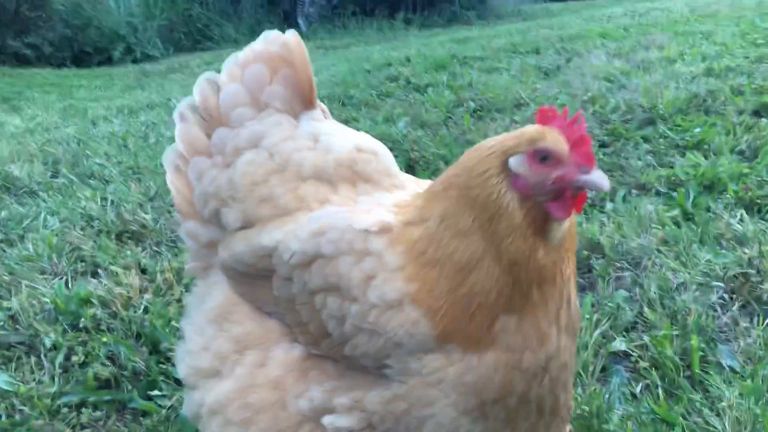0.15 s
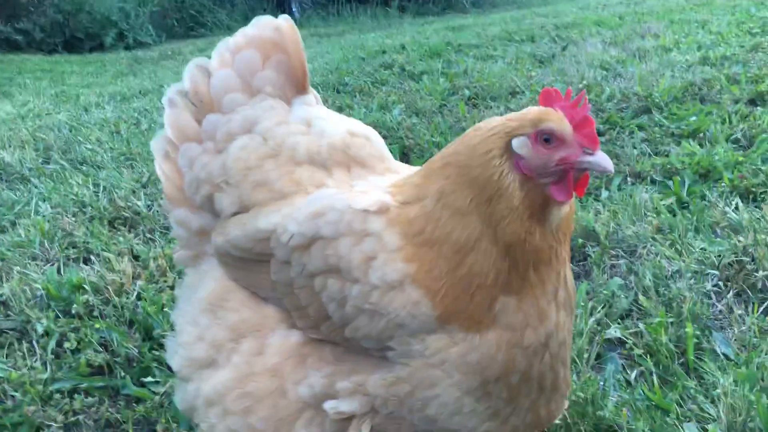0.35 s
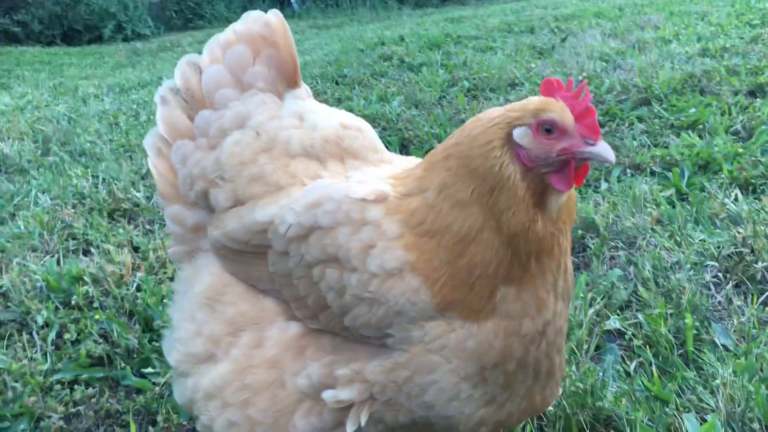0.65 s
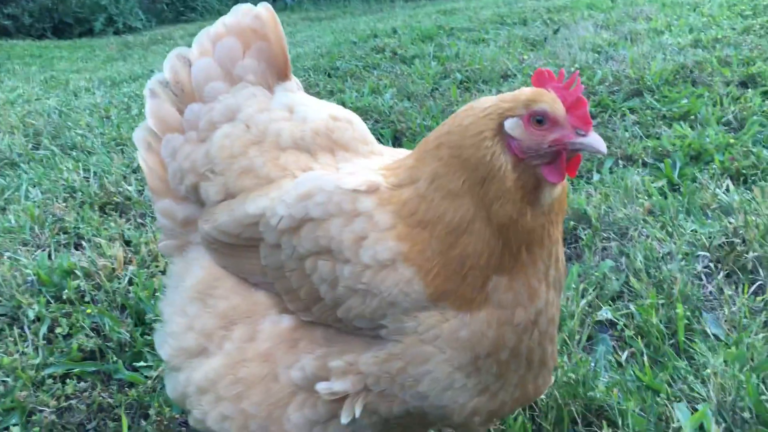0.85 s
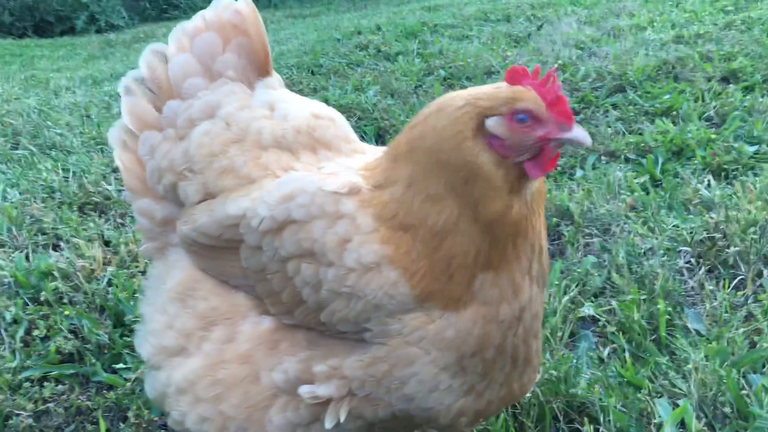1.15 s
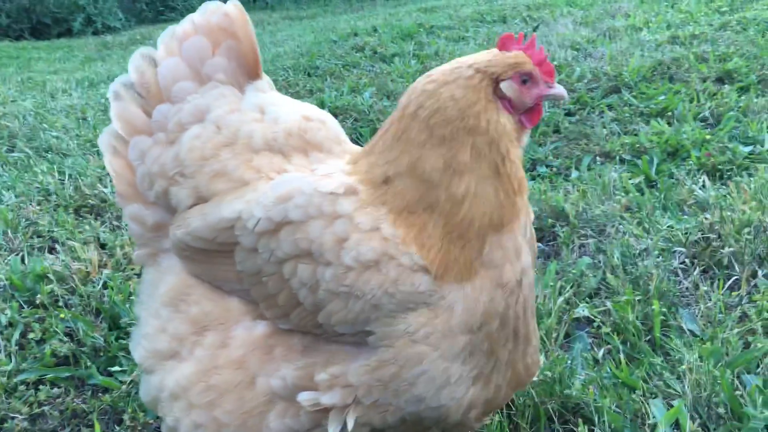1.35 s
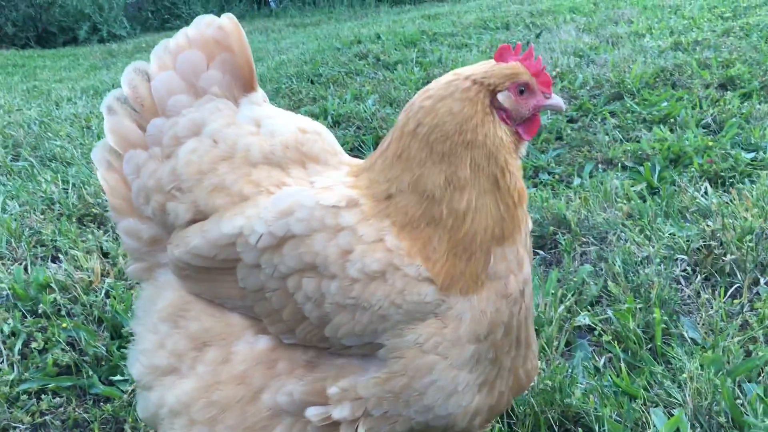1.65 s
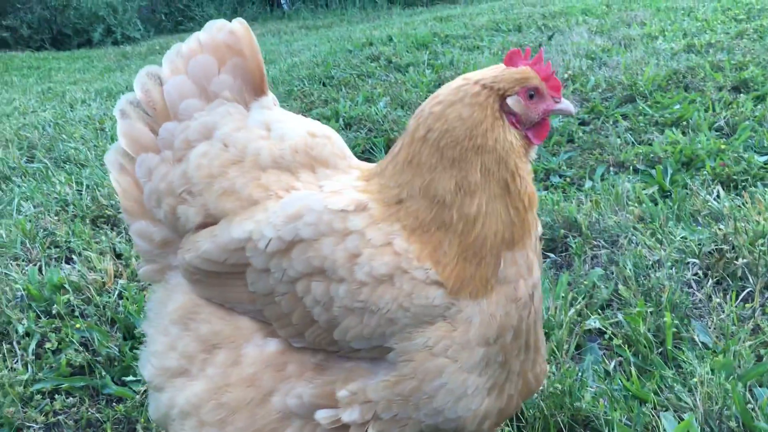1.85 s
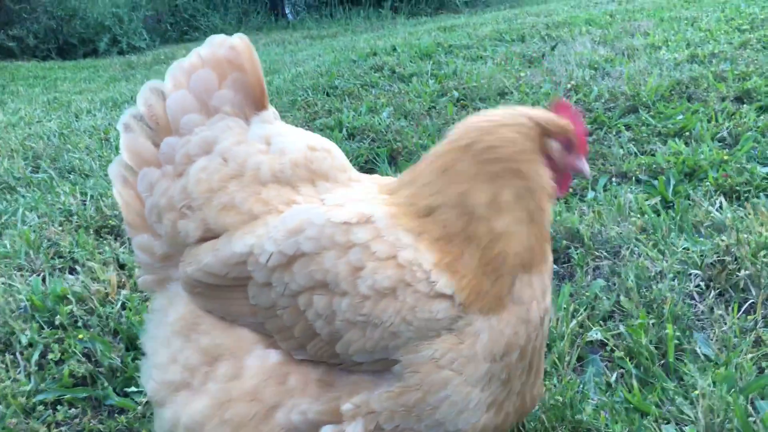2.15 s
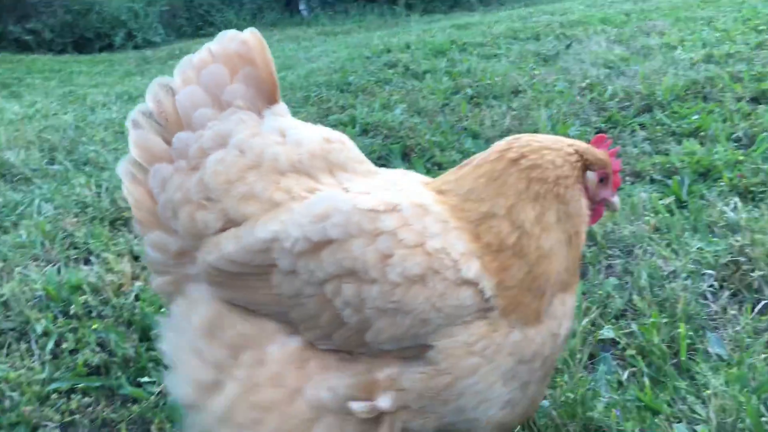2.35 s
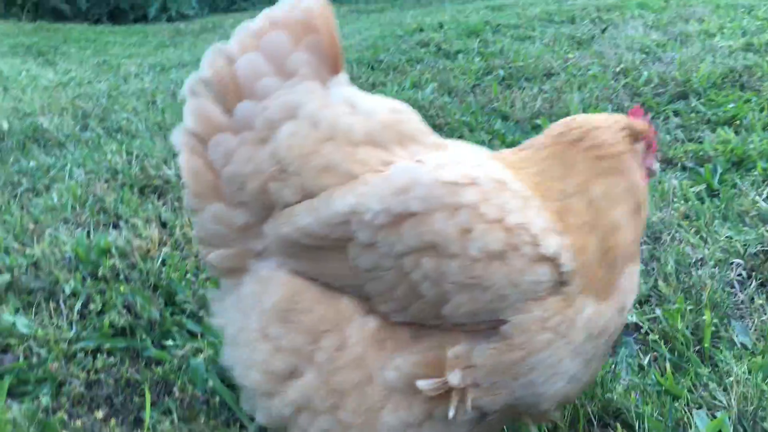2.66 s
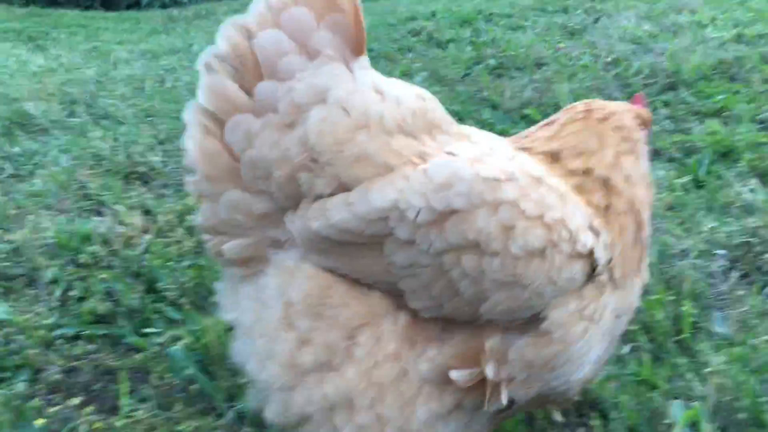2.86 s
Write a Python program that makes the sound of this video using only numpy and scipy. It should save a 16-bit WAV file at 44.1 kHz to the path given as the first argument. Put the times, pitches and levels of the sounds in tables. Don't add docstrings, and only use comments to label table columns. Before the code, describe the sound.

Hen clucking softly outdoors: a single cluck, a purring rattle, then sparse clucks over faint birds

```python
import sys
import numpy as np
from scipy import signal
from scipy.fft import rfft, irfft
from scipy.io import wavfile

SR = 44100
rng = np.random.default_rng(int(sys.argv[2]) if len(sys.argv) > 2 else 0)


def invert_db(level):
    return 10 ** (np.asarray(level, dtype=float) / 20)


def waveform_to_disk(signal):
    frames = np.transpose(np.atleast_2d(signal))
    scaled = np.clip(frames, -1, 1) * 32767
    samples = np.round(scaled).astype(np.int16)
    wavfile.write(sys.argv[1], SR, samples)


N = 132300


def rms_one(x):
    return x / np.sqrt(np.mean(x ** 2) + 1e-24)


def resonate(x, hz, width):
    r = np.exp(-np.pi * max(width, 5) / SR)
    feedback = [1, -2 * r * np.cos(2 * np.pi * hz / SR), r * r]
    return signal.lfilter([(1 - r * r) / 2, 0, (r * r - 1) / 2], feedback, x + 1e-18)


def band_pass(x, low_hz, high_hz):
    return signal.sosfilt(signal.butter(2, (low_hz, high_hz), "band", fs=SR, output="sos"), x)


def hump(x, rise=0.5):
    x = np.clip(x, 0, 1)
    return np.sin(np.pi / 2 * np.where(x < rise, x / rise, (1 - x) / (1 - rise))) ** 2


def add(out, start_s, x):
    i = max(int(start_s * SR), 0)
    out[i:i + len(x)] += x[:N - i]


def drift(rate):
    return np.interp(np.arange(N) * rate / SR, np.arange(200), rng.standard_normal(200))


def coloured(spectrum, patchy_db):
    hz, db = np.transpose(spectrum)
    f = np.arange(N // 2 + 1) * SR / N + 0.00092
    shaped = rfft(rng.standard_normal(N)) * invert_db(np.interp(np.log(f), np.log(hz), db, left=-90))
    third = 3 * np.log2(f)
    out = np.zeros(N)
    for k in range(int(3 * np.log2(hz[0])) - 1, int(3 * np.log2(hz[-1])) + 2):
        band = irfft(shaped * np.maximum(1 - abs(third - k), 0), N)
        out += band * invert_db(patchy_db * drift(8.66))
    return rms_one(out)


# (pitch_hz, level_db per Hz)
RUMBLE = [(19, -43.5), (33, -20), (49, -1), (70, -2), (114, -6.5), (238, -12.5), (281, -17.5), (305, -18.5),
          (550, -32.5), (720, -61), (1210, -120)]
# (pitch_hz, level_db per Hz)
ROAD = [(320, -9), (550, -8.5), (817, -5.5), (983, -0.5), (1100, -2), (1380, -2), (1500, -5), (3170, -22.5),
        (4500, -25.5), (5850, -85), (9900, -120)]
# (pitch_hz, level_db per Hz)
HISS = [(2650, -40.5), (4500, -7), (4990, -1.5), (5620, -1), (7470, -6.5), (9520, -4.5), (10300, -11),
        (11600, -6), (15500, -10)]
# (time_s, level_db)
LEAVES = [(.9, -90), (1.2, -81), (1.5, -80.5), (1.9, -84)]
RUMBLE_DB, ROAD_DB, HISS_DB = -51, -60, -78.5
HUM_HZ, HUM_WIDTH_HZ, HUM_DB = 91.9, 9.5, -57.5


def floor():
    hum = resonate(rng.standard_normal(N), HUM_HZ, HUM_WIDTH_HZ)
    hum = rms_one(resonate(hum, HUM_HZ, HUM_WIDTH_HZ))
    leaves = rms_one(band_pass(rng.standard_normal(N), 3620, 6200))
    breeze = invert_db(np.interp(np.arange(N) / SR, *np.transpose(LEAVES)))
    out = invert_db(RUMBLE_DB) * coloured(RUMBLE, patchy_db=-1.5)
    out += invert_db(HUM_DB) * hum
    out += invert_db(ROAD_DB) * coloured(ROAD, patchy_db=0.6)
    out += invert_db(HISS_DB) * coloured(HISS, patchy_db=-1.6)
    return out + breeze * leaves


# (centre_s, length_s, level_db, low_edge_hz, high_edge_hz)
RUSTLES = [(.005, 0.0089, -66.5, 3000, 16000), (0.24, 0.015, -72, 3000, 5200),
           (2.158, 0.004, -66, 3000, 10100), (2.175, 0.11, -77, 9900, 16000),
           (2.65, .9, -81.5, 7000, 16200), (2.202, .004, -69, 8000, 16000), (2.236, .004, -70, 3000, 14000),
           (2.482, .006, -71, 14000, 16000), (2.588, 0.11, -78, 10000, 15900),
           (2.611, .06, -71, 3880, 8700), (2.676, 0.012, -70.5, 4000, 16000),
           (2.696, .03, -81, 11000, 16000), (2.784, .006, -71, 4500, 9000), (2.887, .004, -68, 6960, 16000),
           (2.922, 0.057, -70, 8000, 15900), (2.939, 0.18, -71, 2900, 8700),
           (2.925, 0.015, -61, 2780, 6770), (2.944, .012, -64, 3000, 7000),
           (2.963, 0.015, -76, 5000, 16000), (2.972, 0.007, -68.5, 11000, 16000),
           (2.996, 0.0046, -71, 8000, 16000), (2.172, .06, -53, 64.4, 162), (2.215, 0.0222, -55, 80, 200)]
GRAINS_PER_S, GRAIN_SPREAD_DB = 10000, 2.2


def grass():
    out = np.zeros(N)
    for centre, length, db, low, high in RUSTLES:
        draw = rng.random((3, 40000))
        clicks = (draw[0] < GRAINS_PER_S / SR) * np.sign(draw[1] - 0.5)
        clicks = clicks * invert_db(-GRAIN_SPREAD_DB * np.log(draw[2] + 0.00081))
        rustle = rms_one(band_pass(clicks, low, high))
        add(out, centre - length / 2, invert_db(db) * rustle * hump(np.arange(40000) / SR / length))
    return out


# (start_s, length_s, start_pitch_hz, end_pitch_hz, level_db)
CHIPS = [
    (.489, 0.03, 5400, 5060, -67),
    (1.629, 0.019, 5520, 5034, -62),
]
# (start_s, length_s, start_pitch_hz, end_pitch_hz, level_db)
WHISTLES = [
    (1.62, 0.073, 3020, 2570, -70.5),
    (2.03, 0.12, 2794, 2260, -68.5),
    (2.135, 0.024, 2720, 2555, -66),
    (2.572, 0.03, 2790, 2520, -66.5),
    (2.788, 0.095, 4900, 4850, -74.5),
    (1.1, 0.056, 4250, 4150, -81),
    (1.3, 0.15, 4050, 3750, -82),
]
TREES_T60_S = 0.93
FLUTTER_S = 0.008


def birds(notes, echo_db, bend, flutter_db):
    out, t = np.zeros(N), np.arange(6000) / SR
    for start, length, first_hz, last_hz, db in notes:
        hz = last_hz + (first_hz - last_hz) * np.clip(1 - t / length, 0, 1) ** bend
        waver = invert_db(flutter_db * np.interp(t / FLUTTER_S, np.arange(20), rng.standard_normal(20)))
        waver = waver / np.sqrt(np.mean(waver[t < length] ** 2))
        shape = waver * hump(t / length, rise=0.28) ** 0.15
        add(out, start, invert_db(db + 1.5) * shape * np.sin(2 * np.pi * np.cumsum(hz) / SR))
    lag = np.arange(SR // 2) / SR
    trees = rng.standard_normal(len(lag)) * invert_db(-60 * lag / TREES_T60_S) * (lag > 0.012)
    echo = signal.fftconvolve(out, trees / np.sqrt(np.sum(trees ** 2)))[:N]
    return out + invert_db(echo_db) * echo


# (start_s, length_s, level_db, first_pulse_rate_hz, last_pulse_rate_hz)
CLUCKS = [
    (.2486, 0.0169, -27.5, 293.6, 340),
    (2.1222, 0.0077, -30.5, 273, 296),
    (2.1253, 0.0044, -48, 303, 301),
    (2.4118, 0.0175, -30, 247.3, 340),
    (2.7288, 0.009, -51.5, 200.4, 200.7),
    (2.735, .014, -51, 416, 435),
    (.8025, 0.0063, -39, 480, 500),
]
# (pitch_hz, width_hz, level_db)
TRACTS = [
    [(340, 335, 5.5), (670, 150, 8.5), (1357, 72, -13.5), (3280, 190, -14.5), (4160, 410, -19.5),
     (8000, 2400, -24)],
    [(328, 330, -4), (700, 210, 0.5), (1560, 150, -17), (2430, 300, -28), (4500, 670, -40),
     (7400, 1500, -44)],
    [(2530, 350, -11), (4030, 430, 5), (5250, 93, -3.5), (6600, 440, -9), (8450, 900, -11)],
    [(290, 132, 3.5), (700, 210, 12.5), (1060, 220, -3), (1730, 110, -7), (2700, 450, -24),
     (3750, 96, -10.5), (4620, 130, -20), (6500, 480, -17), (8340, 150, -30)],
    [(1900, 280, -7), (2400, 160, -9), (3240, 170, -5), (4300, 89, -16)],
    [(1250, 300, 9), (3150, 280, 1), (4370, 97, -12)],
    [(500, 190, 0), (900, 270, 3), (1460, 400, -8), (3180, 160, -4), (4200, 370, -17.5)],
]
# (start_s, length_s, level_db, first_pulse_rate_hz, last_pulse_rate_hz)
SLIPS = [
    (.831, 0.0082, -37, 470, 480),
    (.851, 0.0094, -35.5, 434, 480),
    (.873, 0.0065, -34, 443, 480),
]
# (pitch_hz, width_hz, level_db)
SLIP_TRACT = [(480, 390, 7), (970, 420, 1), (1460, 450, -25), (3130, 340, -14.5), (4250, 280, -24)]
CLUCK_JITTER, CLUCK_RASP = 0.02, 0.2


def clucks(calls, tracts):
    out, t = np.zeros(N), np.arange(3000) / SR
    for (start, length, db, first_hz, last_hz), tract in zip(calls, tracts):
        draw = rng.standard_normal((2, len(t)))
        rate = first_hz + (last_hz - first_hz) * np.clip(t / length, 0, 1)
        rate = rate * (1 + CLUCK_JITTER * np.repeat(draw[0, :30], 100))
        phase = np.cumsum(rate) / SR + 0.65
        pulses = np.diff(np.floor(phase), prepend=0) * hump(t / length, rise=0.47) ** 0.13
        puffs = CLUCK_RASP * draw[1] * np.exp(-4 * (phase % 1))
        puffs = puffs * hump(t / length, rise=0.12) ** 0.12
        voice = np.zeros(len(t))
        for k, (hz, width, gain_db) in enumerate(tract):
            source = pulses + puffs * min(hz / 3000, 1)
            ring = resonate(resonate(source, hz, width * 1.94), hz, width * 1.82)
            voice += (-1) ** k * invert_db(gain_db) * 300 / width * ring
        add(out, start, -invert_db(db) * voice / abs(voice).max())
    return out


# (centre_s, level_db, throat_pitch_hz, rasp_db, length_s)
THROBS = [(0.5492, -31, 715, -13.5, 0.0034), (0.5827, -50, 730, 6, 0.005),
          (0.6388, -38.5, 833, 3.5, 0.0058), (0.658, -29, 820, -6.5, 0.01),
          (0.677, -31.5, 850, -4.5, 0.0087), (0.6955, -28, 823, -8, .011), (0.7149, -27.5, 856, -9.5, .012),
          (0.734, -22, 796, -13, 0.013), (0.753, -23.5, 784, -15, .015), (0.7728, -24.5, 768, -16, 0.014),
          (0.792, -24.5, 698, -15.5, .016), (0.812, -24, 774, -18.5, .014), (0.8285, -30.5, 700, -18, .011),
          (0.8447, -33.5, 706, -12, .012), (0.866, -33, 678, -23, .011), (0.8845, -33.5, 720, -24, .012),
          (1.11, -46, 684, -25, 0.007), (2.132, -33, 688, -35, .012), (2.142, -36, 680, -21, .014),
          (2.432, -34.5, 687, -38, 0.017), (0.2633, -28.5, 670, -42, .012),
          (2.7315, -37, 737, -30, 0.00827), (2.7358, -35, 880, -22, .007), (2.747, -48, 1240, -30, .012)]
# (pitch_hz, width_hz, level_db)
PIPE = [
    (1300, 192, 11),
    (2130, 120, -12.5),
    (2830, 175, 3.5),
    (4140, 200, -14.5),
    (5200, 280, -19.5),
    (6300, 930, -25),
    (8060, 260, -23),
    (480, 290, 2),
]
# (time_s, share of pitch)
SAG = [(.56, -0.3), (.64, 0.32), (.72, .25), (.735, -0.14), (.815, -.04), (.83, .3), (.89, 0.029),
       (2.2, 0.12), (2.7, 0.1)]
BEAK_S, BEAK_SHIFT = (0.49, 0.633, 0.78), (1.16, 0.99, 1.11)
SWELL_S, THROB_RISE = (0.94, 0.735), (0.31, 0.5)
RASP_LAG_S, RASP_SHARE = (0.00164, 0.0035), 0.844
RASP_PER_S = 900
RING_DOWN_S = 0.001975


def trill():
    out, t = np.zeros(N), np.arange(1800) / SR
    for centre, db, throat_hz, rasp_db, length in THROBS:
        draw = rng.random((3, len(t)))
        rise = np.interp(centre, SWELL_S, THROB_RISE)
        sag = np.interp(centre, *np.transpose(SAG))
        hz = throat_hz * (1 + sag * (0.5 - t / length))
        swing = hump(t / length, rise) ** 4 * np.sin(2 * np.pi * np.cumsum(hz) / SR)
        swing = resonate(swing, throat_hz, 1 / (np.pi * RING_DOWN_S))

        slaps = ((draw[0] < RASP_PER_S / SR) + 0.13) * (draw[1] - 0.5)
        slaps = slaps * hump(t / length / RASP_SHARE, rise=0.42) ** 0.2
        slaps[30] = 0.32
        slaps = np.roll(slaps, int(np.interp(centre, SWELL_S, RASP_LAG_S) * SR))
        rasp = np.zeros(len(t))
        for k, (pipe_hz, width, gain_db) in enumerate(PIPE):
            if k == 2:
                pipe_hz = pipe_hz * np.interp(centre, BEAK_S, BEAK_SHIFT)
            ring = resonate(resonate(slaps, pipe_hz, width * 1.3), pipe_hz, width * 3.1)
            rasp += (-1) ** k * invert_db(gain_db) * ring / np.sqrt(width)

        throb = swing / abs(swing).max() + invert_db(rasp_db) * rasp / abs(rasp).max()
        add(out, centre - length * rise - RING_DOWN_S / 2, invert_db(db) * throb)
    return out


def scene():
    far_birds = birds(CHIPS, echo_db=-4, bend=4.0, flutter_db=2.5)
    far_birds += birds(WHISTLES, echo_db=-7, bend=1.15, flutter_db=3)
    hen = clucks(CLUCKS, TRACTS) + clucks(SLIPS, [SLIP_TRACT] * len(SLIPS)) + trill()
    return (floor() + grass() + far_birds + hen)[None]


def top_cut(x):
    return signal.sosfilt(signal.butter(12, 15620, fs=SR, output="sos"), x)


def record(dry):
    spectrum = rfft(dry)
    hz = np.arange(spectrum.shape[-1]) * SR / N
    mix = irfft(spectrum * (hz < 15740), N)
    return top_cut(mix)


dry = scene()
out = record(dry)
waveform_to_disk(out)
```